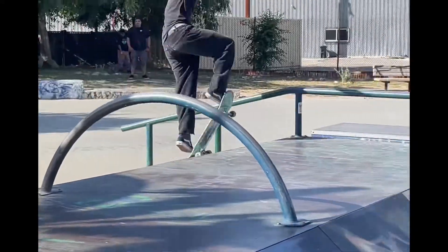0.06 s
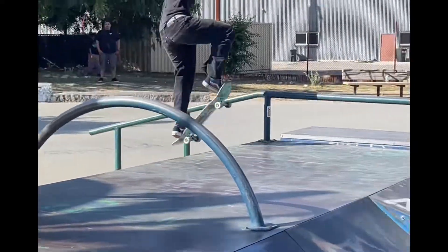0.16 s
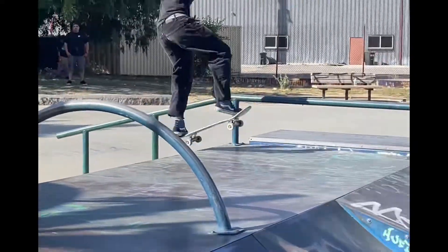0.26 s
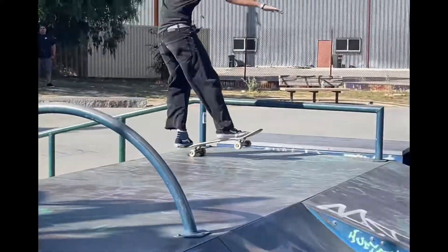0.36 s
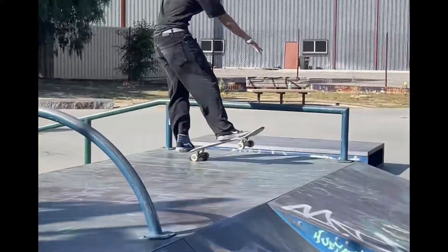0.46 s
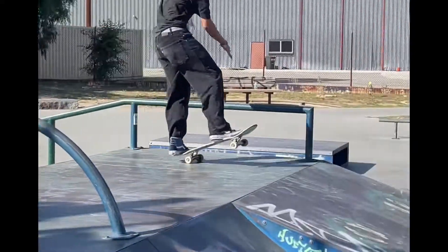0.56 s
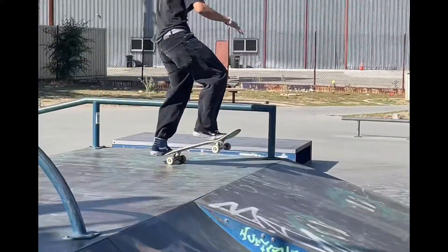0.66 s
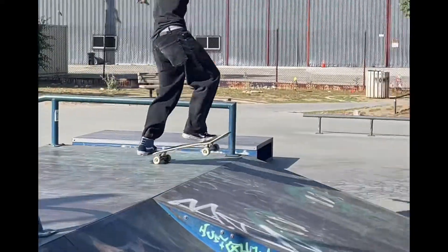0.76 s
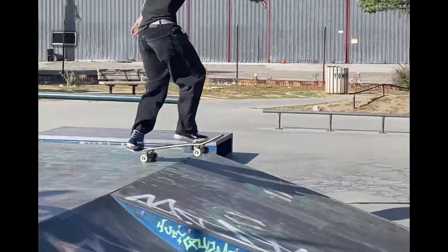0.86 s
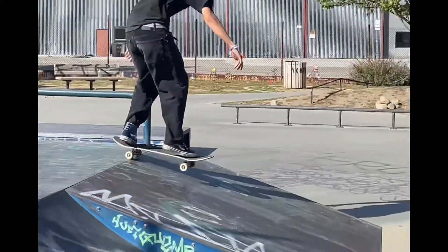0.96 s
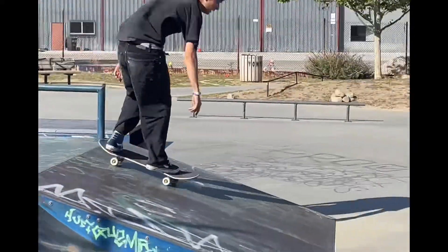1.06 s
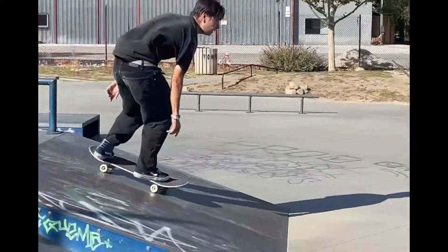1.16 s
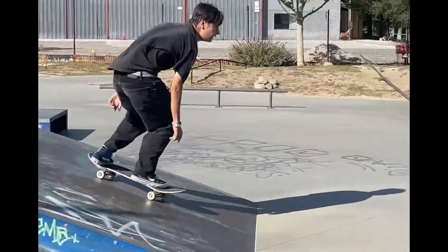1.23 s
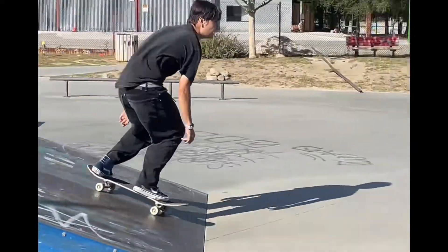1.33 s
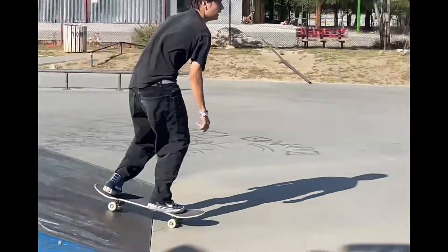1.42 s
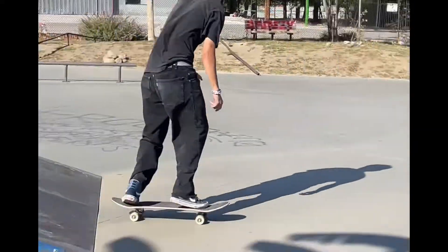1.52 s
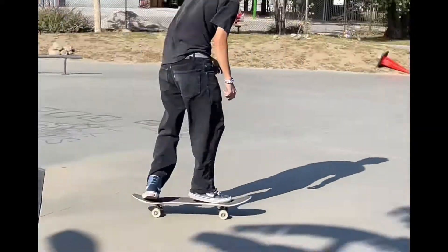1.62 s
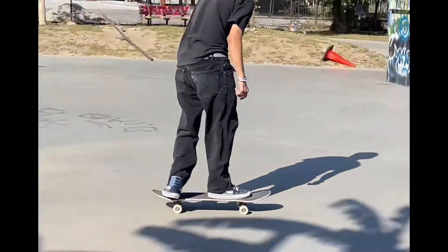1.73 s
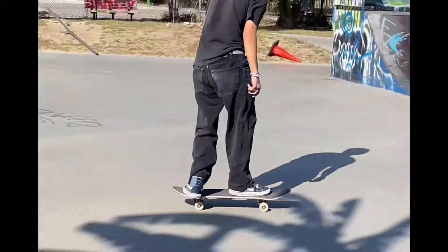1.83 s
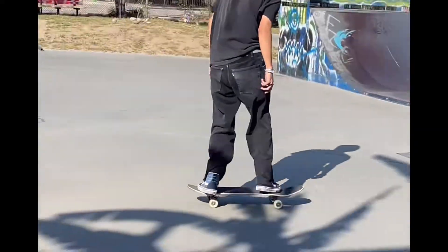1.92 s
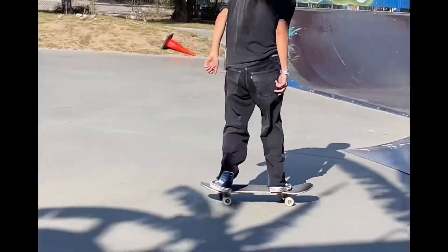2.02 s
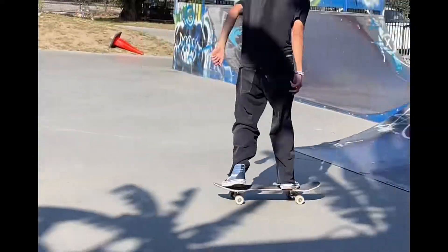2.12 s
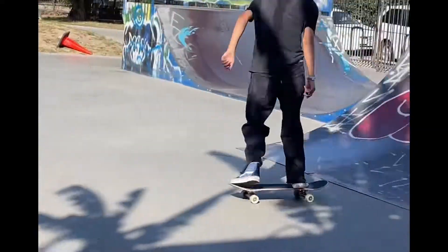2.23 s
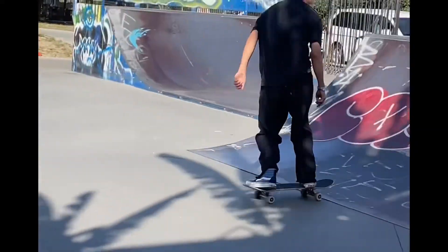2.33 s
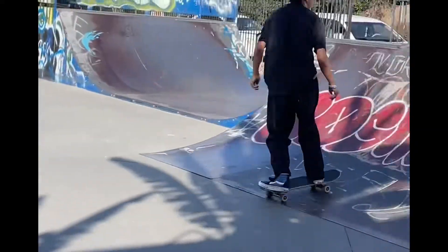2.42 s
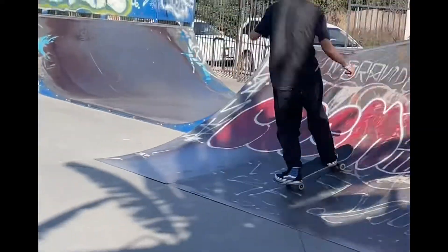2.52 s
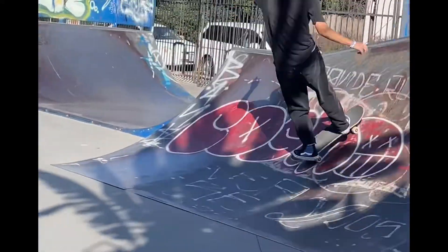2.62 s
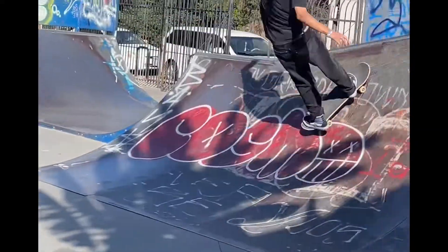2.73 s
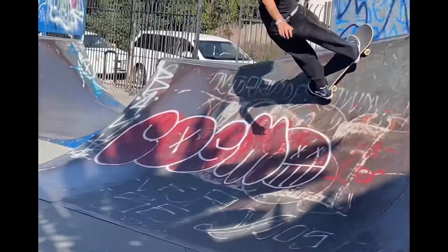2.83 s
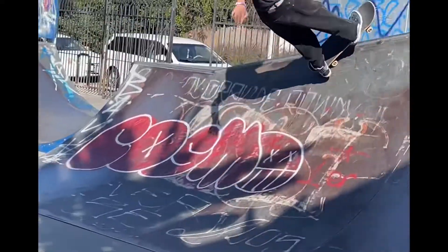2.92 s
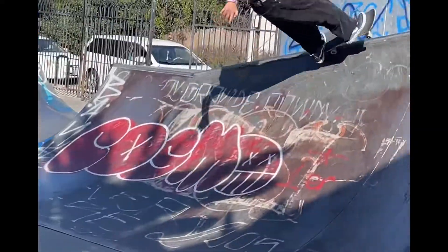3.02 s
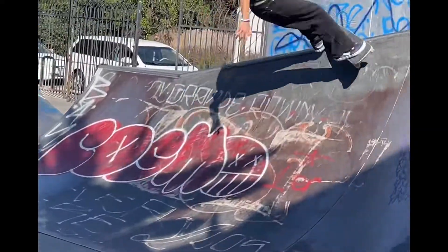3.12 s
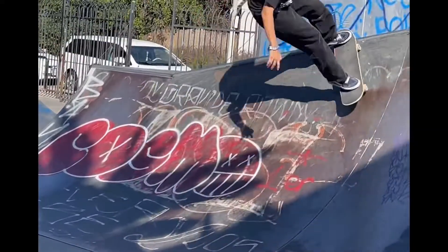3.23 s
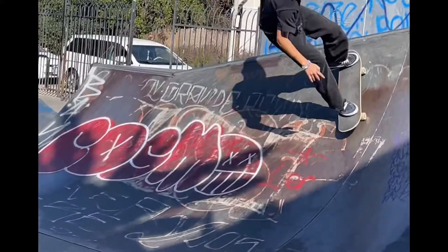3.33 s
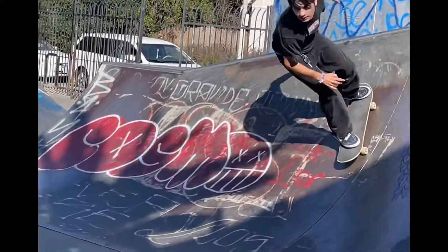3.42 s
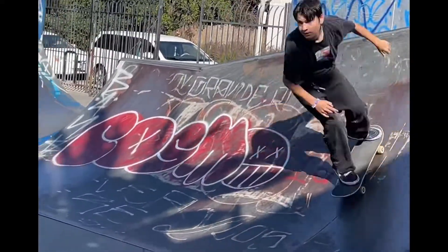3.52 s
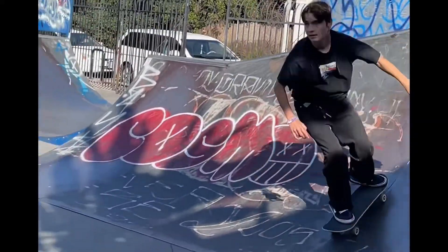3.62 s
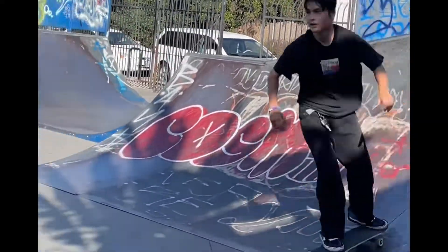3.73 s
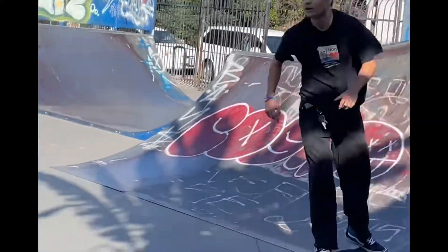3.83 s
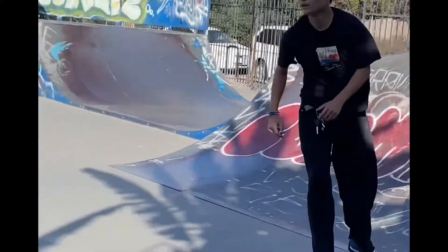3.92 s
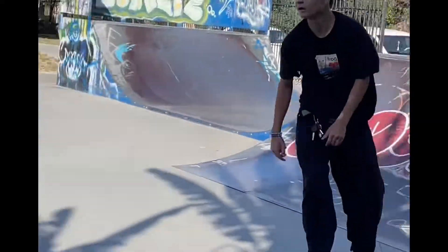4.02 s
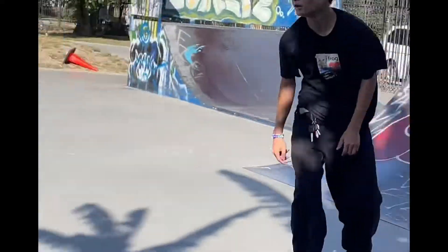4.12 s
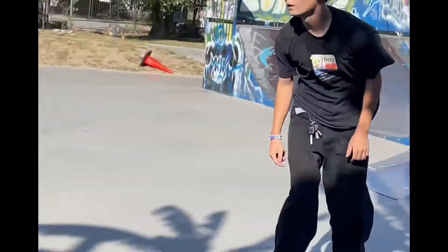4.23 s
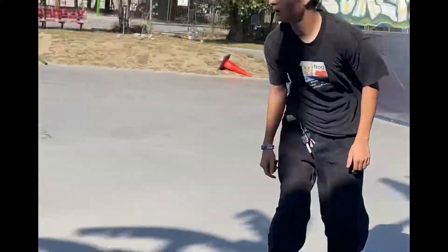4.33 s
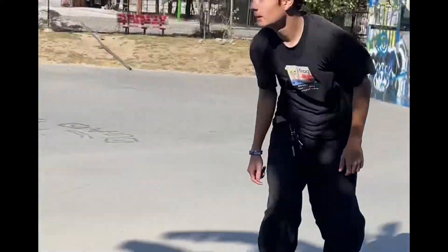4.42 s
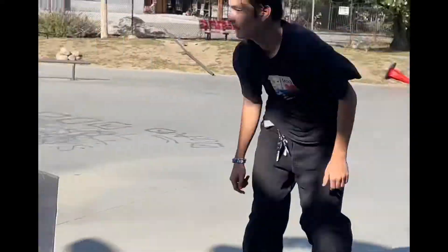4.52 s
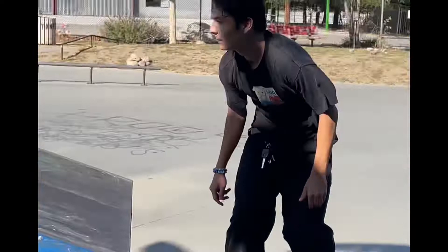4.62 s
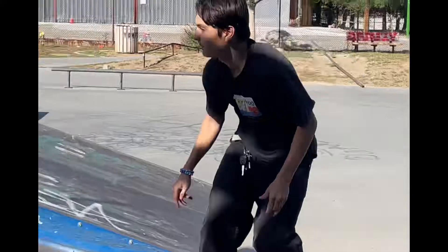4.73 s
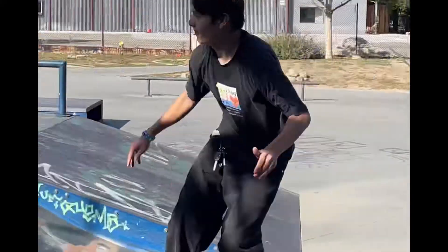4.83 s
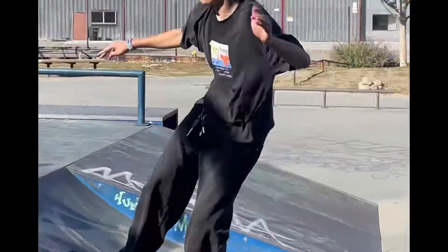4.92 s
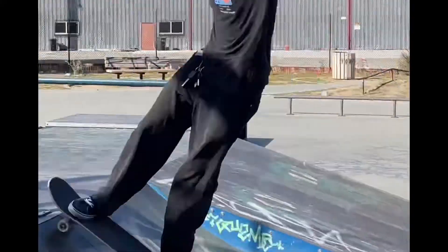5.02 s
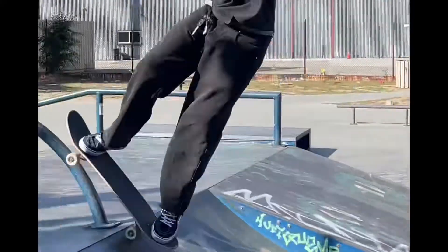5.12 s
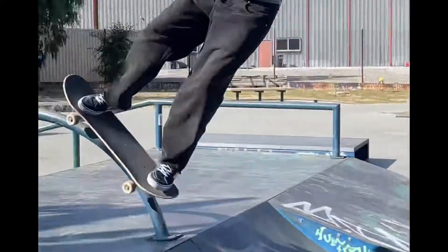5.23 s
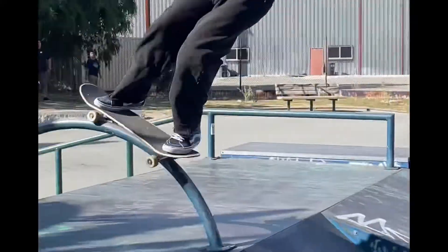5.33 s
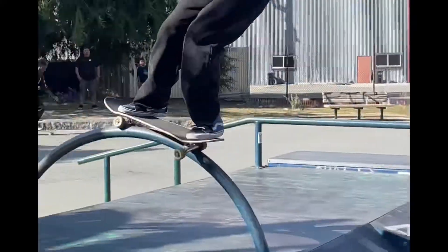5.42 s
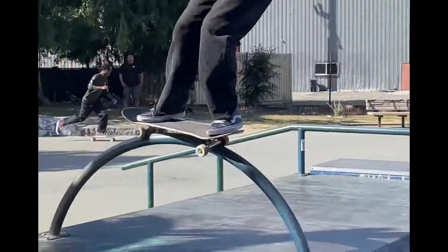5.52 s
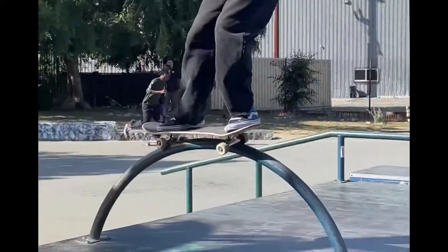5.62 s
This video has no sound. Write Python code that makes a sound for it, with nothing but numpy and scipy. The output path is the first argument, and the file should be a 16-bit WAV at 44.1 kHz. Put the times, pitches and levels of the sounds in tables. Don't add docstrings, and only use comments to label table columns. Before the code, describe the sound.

A skateboard heard from a few metres away in an open-air skatepark, close and mostly dry, with faint short echoes and light low wind. Wheels rumble on a hollow steel-clad box; at 0.33 s the board knocks down sharply with a low thud. The roll softens until about 1.03 s, when loose plates clack and rattle briefly. Dry double slaps at 1.42 and 1.5 s drop onto concrete, where wheels hum, hiss and sing until 2.3 s. A bright steel clatter at 2.37-2.47 s enters the bank; rougher rolling carries small ticks near 2.85-3.0 s, a hard knock at 3.28 s and lighter knocks at 3.8-3.9 s. Smoother concrete rolling fades toward 4.75 s, then loud plate clangs and hollow thuds tumble until 4.95 s. At 5.2 s the deck slams onto a steel rail, ringing briefly with a raspy scrape that eases by 5.4 s; another knock lands at 5.48 s, with faint scraping at the end.

```python
import sys
import numpy as np
from scipy import signal
from scipy.fft import rfft, irfft, next_fast_len
from scipy.io import wavfile
from scipy.ndimage import uniform_filter1d

SR = 44100
rng = np.random.default_rng(int(sys.argv[2]) if len(sys.argv) > 2 else 0)


def wav_record(signal):
    frames = np.transpose(np.atleast_2d(signal))
    bounded = np.clip(frames, -1, 1)
    quanta = np.round(bounded * 32767).astype(np.int16)
    wavfile.write(sys.argv[1], SR, quanta)


def natural_amplitude(level_db):
    exponent = np.asarray(level_db, float) / 20
    return 10 ** exponent


N = 249606

# t/s, load on the ground level/dB, tread roughness level/dB
ROLL = [(0.0, -23.5, -40.5), (0.252, -31, -50.5), (0.43, -21.5, -40.5), (0.721, -32.5, -56.5),
        (1.05, -37, -57.5), (1.2, -24.5, -40.5), (1.59, -20, -43.5), (2.298, -39.5, -63.5),
        (2.41, -29.5, -32), (2.72, -25, -34.5), (2.88, -22.5, -32.5), (3.05, -22.5, -42.5),
        (3.33, -24, -31), (3.6, -31, -37), (4.749, -40, -52), (4.98, -27.5, -47), (5.37, -20.5, -50),
        (5.66, -29, -66)]
# from t/s, lowest bending resonance f/Hz, its share level/dB, deck drone level/dB, bearing hiss level/dB
STRETCHES = [(0, 79.6, 5.5, 3.5, -32), (0.378, 109, -3.5, 7, -29), (0.852, 95.2, 4, 7, -28),
             (1.252, 113.5, -10, 3, -24), (1.42, 200.7, -5.5, 5, -22.5), (1.56, 113.1, 0.5, 2, -21.5),
             (2.1, 111.7, 2.5, 4.5, -17), (2.37, 189.8, -10, 3.5, -24.5), (2.7, 186, -3.5, 4, -22.5),
             (3.069, 114.5, -20, 1, -23.5), (3.17, 114.6, -23.5, 0.5, -27.5),
             (3.251, 90.2, 6.5, 4.5, -15.5), (3.401, 163.2, 4.5, 3, -16), (3.58, 163.1, 0.5, 2.5, -23.5),
             (3.82, 170, -3, 4, -20), (4.151, 166.5, 0.5, -5.5, -24.5), (4.581, 149.3, -1, 2, -18.5),
             (4.759, 164.4, -2.5, 10, -26), (5.302, 109, -15, 10.5, -19.5)]
# f/Hz, level/dB per Hz
RUMBLE = [(35, -44), (60, -11.5), (75, -1), (113, 1), (156, -6), (182, -9.5), (216, -3), (300, -14.5),
          (390, -11), (660, -120)]
# f/Hz, level/dB per Hz
DRONE = [(120, -16.5), (200, -8), (286, -5), (381, -6), (420, -8), (686, -9.5), (1100, -15.5), (1410, -20),
         (2000, -28), (2600, -33), (4400, -120)]
# f/Hz, level/dB per Hz
HISS = [(2500, -33), (3200, -2), (4500, -4), (6500, -3), (8000, -4.5), (10000, -11), (13000, -10.5),
        (15500, -21), (17000, -34)]
# from t/s, to t/s, level/dB
SINGING = [
    (1.543, 2.365, -39),
    (3.936, 4.366, -43.5),
    (4.371, 4.78, -41),
]
# f/Hz, width f/Hz, level/dB
WHEEL_MODES = [(583, 167, 9.5), (900, 610, 2.5), (1420, 390, 6.5), (1800, 360, -3.5), (1990, 93, -1.5),
               (3500, 300, -13.5)]

# t/s, clack level/dB, boom level/dB, knock level/dB, time to fall 60 dB t/s
PLATE_HITS = [(1.0322, -6, -3.5, -2.5, 0.073), (1.0478, -9, -9.5, -16, 0.073),
              (1.0622, -9, -34, -23, 0.046), (1.0825, -31.5, -19.5, -21, 0.42),
              (2.366, 0.5, -10.5, -10.5, 0.21), (2.3914, -15.5, -32, -23, 0.036),
              (2.409, -9, -17, -20, 0.032), (2.4454, -1, -25.5, -13, 0.12),
              (2.4614, -14.5, -15.5, -26.5, 0.29), (3.014, -12.5, -21.5, -20, 0.16),
              (4.7588, 3.5, -4.5, -14.5, 0.1), (4.7724, 1, -18.5, -26, 0.034),
              (4.7875, -18.5, -28, -16.5, 0.38), (4.8338, -6.5, -10.5, -18.5, 0.11),
              (4.8474, -12.5, -26, -15, 0.085), (4.8713, -43, -17, -27, 0.66),
              (5.1968, 6, -37, -8.5, 0.094), (5.2274, -15, -19.5, -25, 0.37),
              (5.255, -1, -17.5, -13, 0.037)]
# t/s, clack level/dB, boom level/dB, knock level/dB, time to fall 60 dB t/s
BOARD_HITS = [(0.0024, -40, -29.5, -50, 0.037), (0.3281, -10, -14.5, -9, 0.076),
              (0.3582, -34, -19.5, -24.5, 0.12), (1.4215, -43, -5.5, -9.5, 0.0076),
              (1.4258, -27, -12, -22, 0.024), (1.4965, -25, -54, -14.5, 0.018),
              (1.508, -19, -16, -16, 0.04), (3.244, -25.5, -38, -24, 0.07), (3.278, -4, -15, -7, 0.026),
              (3.3187, -31, -37, -32, 0.017), (3.806, -16, -26, -27, 0.039),
              (3.8821, -16, -23, -12.5, 0.036), (5.4835, -5, -23, -19, 0.088),
              (5.509, -15, -41.5, -31, 0.032)]
# f/Hz, width f/Hz, level/dB
PLATE_MODES = [(2210, 360, 3.5), (2750, 387, 13.5), (2905, 195, 15), (3220, 245, 8.5), (3540, 1800, 0.5),
               (5100, 200, -16), (5550, 280, -16)]
# f/Hz, width f/Hz, level/dB
BOX_MODES = [(90, 13.4, 1.5), (111.7, 27.5, 4.5), (170, 32.8, 3), (234.3, 16.3, 3.5), (273, 86, -3.5),
             (500, 119, -6)]
# f/Hz, width f/Hz, level/dB
DECK_MODES = [(530, 40, -14), (646, 152, -0.5), (1000, 312, -1), (1400, 300, 1.5), (1700, 670, -6.5)]

# f/Hz, level/dB, time to fall 60 dB t/s
RAIL_MODES = [(497.6, -26.5, 0.23), (537, -27.5, 0.14), (784, -25.5, 0.075), (1147, -36.5, 0.13),
              (2500, -46.5, 0.074), (3240, -45, 0.23), (3300, -50, .1)]
# t/s, level/dB
RAIL_HITS = [
    (5.195, 13.5),
    (5.257, -18),
    (5.331, -4),
    (5.485, -3),
    (5.568, -11.5),
]
# t/s, level/dB
SCRAPE = [
    (5.19, -61),
    (5.202, -5.5),
    (5.3, -5),
    (5.385, -13.5),
    (5.41, -30),
    (5.48, -43),
    (5.55, -56),
    (5.58, -28),
    (5.66, -24),
]

# t/s, peak level/dB, ring f/Hz, width f/Hz
KNOCKS = [(0.3306, -4.5, 2750, 1780), (0.334, -4.5, 1190, 695), (.343, -10.5, 1490, 1210),
          (.353, -14.5, 900, 900), (.39, -26, 2420, 1500), (3.025, -18.5, 3580, 900),
          (3.06, -27.5, 3600, 600), (5.203, -11, 3500, 700), (5.257, -12.5, 3300, 2000),
          (5.259, -15, 1500, 1500), (5.388, -23, 1600, 1500), (1.036, -15.5, 597, 500),
          (1.041, -5.5, 3010, 600), (1.049, -8, 1730, 1090), (1.057, -18, 1950, 500),
          (1.063, -6.5, 2940, 500), (1.082, -15, 2900, 302), (1.096, -11, 2940, 500),
          (1.165, -20.5, 2780, 900), (2.366, -6.5, 843, 604), (2.369, -1.5, 2710, 290),
          (2.367, -5, 3400, 693), (2.371, -8, 177, 120), (2.39, -7.5, 3710, 1510), (2.398, -11.5, 183, 120),
          (2.381, -13.5, 3150, 1200), (2.4, -4.5, 2970, 1000), (2.409, -9.5, 3300, 900),
          (2.444, -9.5, 2710, 900), (2.45, -7, 3270, 1210), (2.456, -11, 2200, 900),
          (2.464, -11.5, 3470, 900), (2.474, -21, 3380, 700), (4.766, -7, 2340, 600),
          (4.772, -2, 3040, 1300), (4.79, -17, 3300, 700), (4.8, -11, 2980, 700),
          (4.833, -15.5, 2980, 1500), (4.845, -11, 3500, 1000), (4.867, -8.5, 2340, 1200),
          (4.878, -11, 3000, 900), (3.18, -17.5, 816, 300), (3.205, -16.5, 1240, 300),
          (3.2435, -19, 1700, 900), (3.253, -36, 1650, 300), (3.265, -16, 1580, 298),
          (3.279, -2, 1560, 900), (3.281, -7, 700, 600), (3.319, -16, 1240, 500),
          (3.8075, -28.5, 2200, 900), (3.815, -20.5, 1320, 790)]
# t/s, peak level/dB, ring f/Hz, width f/Hz
SLAPS = [(.084, -16, 2600, 2500), (.255, -27.5, 2180, 2500), (1.0335, -9.5, 424, 400),
         (1.4205, -5.5, 900, 1400), (1.428, -9, 785, 1190), (1.434, -6.5, 500, 500),
         (1.496, -7.5, 1120, 1400), (1.4975, -7, 139, 119), (1.507, -6, 697, 600),
         (2.9574, -13, 1400, 1200), (3.014, -12.5, 2500, 2500), (3.243, -32, 2180, 2500),
         (3.808, -19, 1790, 2000), (3.8835, -14.5, 1080, 1400), (5.4835, -11.5, 1600, 1990)]
# t/s, peak level/dB, ring f/Hz, width f/Hz
THUDS = [(.357, -15.5, 397, 250), (.381, -19, 222, 120), (.415, -10.5, 208, 100), (2.37, -18.5, 103, 50),
         (2.9, -20.5, 135, 60), (2.932, -11.5, 130, 59.5), (2.962, -21.5, 117, 60), (3.815, -19, 197, 101),
         (4.759, -14.5, 418, 248), (5.199, -5.5, 500, 201), (1.047, -16.5, 170, 90), (1.057, -11, 114, 60),
         (1.088, -14, 132.4, 59.6), (1.155, -10.5, 105.5, 50), (1.195, -19.5, 152, 81.5),
         (1.5, -25.5, 196, 90), (2.478, -8, 308, 198), (3.282, -10.5, 104.3, 60), (3.345, -15, 216, 150),
         (3.374, -16.5, 204, 151), (4.78, -10.5, 405, 200), (4.806, -6, 374, 200), (4.862, -9.5, 308, 151),
         (4.887, -18.5, 376, 150), (4.91, -11, 322, 151), (4.945, -9, 303, 131), (5.225, -9.5, 540, 99)]
# t/s, peak level/dB, ring f/Hz, width f/Hz
CLANGS = [(1.04, -7, 2000, 1500), (1.063, -16.5, 2900, 1500), (1.11, -31, 2880, 900),
          (.345, -21, 1860, 2000), (1.436, -22, 2860, 1400), (1.545, -25.5, 2000, 1990),
          (3.29, -24.5, 4050, 3000), (3.345, -22.5, 3500, 2500), (1.515, -21, 2780, 900),
          (2.455, -11, 3740, 2000), (3.015, -22.5, 3510, 1000), (4.761, -2.5, 3280, 596),
          (4.763, -4.5, 373, 130), (4.837, -9, 2450, 900), (4.845, -31.5, 3500, 2190)]
# t/s, peak level/dB, ring f/Hz, width f/Hz
SNAPS = [(1.4205, -36, 9400, 6000), (1.428, -35, 10000, 5030), (1.497, -14, 11000, 5040),
         (1.507, -21.5, 9600, 6030), (.33, -30.5, 10500, 5000), (1.032, -35, 10500, 5000),
         (2.364, -36.5, 10500, 5000), (4.759, -16, 10500, 5012), (2.9574, -21.5, 10500, 5030),
         (3.277, -20.5, 10500, 4970), (3.8835, -23.5, 10500, 5000), (5.1955, -1.5, 10400, 5028)]
# t/s, peak level/dB, ring f/Hz, width f/Hz
TICKS = [(0.0847, -20, 2870, 2720), (.167, -30.5, 4040, 4030), (0.2545, -24, 2020, 3020),
         (.561, -42.5, 5300, 1500), (.942, -45, 3500, 2500), (.994, -39.5, 5000, 2500),
         (2.8448, -20, 2100, 1200), (2.849, -15, 1100, 700), (2.847, -30, 5800, 1500),
         (2.885, -21, 1900, 800), (2.8845, -18.5, 5220, 1090), (2.9574, -17.5, 1550, 345),
         (3.165, -26, 2500, 3500), (3.18, -23.5, 5000, 4000), (3.243, -35, 3500, 3500),
         (3.277, -3, 3435, 900), (3.835, -22.5, 4940, 3500), (3.85, -23, 5000, 3500),
         (3.8835, -38, 1760, 900), (5.143, -25.5, 5730, 1800), (5.195, -6, 1400, 300),
         (5.378, -29, 5750, 1490), (5.4846, -15.5, 2010, 796), (5.525, -20.5, 1470, 1200)]

# t/s, peak level/dB
GUSTS = [
    (0.0, -42.5),
    (.5, -32),
    (1.22, -28.5),
    (1.88, -33),
    (5.4, -43.5),
]
# f/Hz, level/dB
PORT_SUM = [(28, -15.5), (44, -0.5), (5000, -0.5), (6300, -5.5), (7500, -12), (9100, -12), (9500, -24),
            (13900, -33.5), (14600, -15.5), (15700, -11.5), (16200, -21)]
# f/Hz, level/dB
PORT_DIFFERENCE = [(100, -47), (200, -39), (380, -21), (700, -14.5), (1300, -21), (2800, -10),
                   (3450, -10.5), (3600, -45.5), (5000, -38.5), (5200, -9), (7000, -7.5), (12000, -5),
                   (13500, -18), (15600, -3.5), (16000, -52)]


def rms_one(x):
    return x / np.sqrt(np.mean(x ** 2) + 1e-20)


def at_hz(points, hz):
    table = np.array(points)
    return np.interp(np.log(np.maximum(hz, 1)), np.log(table[:, 0]), table[:, 1])


def coloured(x, spectrum):
    hz = np.arange(N // 2 + 1) * SR / N
    return rms_one(irfft(rfft(x) * natural_amplitude(at_hz(spectrum, hz)), N))


def band(x, low_hz, high_hz):
    edges = [low_hz, min(high_hz, 0.45 * SR)]
    return signal.sosfilt(signal.butter(2, edges, "band", fs=SR, output="sos"), x)


def drift(rate):
    step = 40
    r = np.exp(-2 * np.pi * step * rate / SR)
    noise = rng.standard_normal(N // step + 2002)
    slow = signal.lfilter([1], [1, -2 * r, r * r], noise)[2000:]
    return np.interp(np.arange(N) / step, np.arange(len(slow)), rms_one(slow))


def body(x, peaks, widen):
    out = 0
    for k, (hz, width, db) in enumerate(peaks):
        r = np.exp(-np.pi * width * widen / SR)
        b = (1 - r * r) / 2 * np.array([1, 0, -1])
        a = [1, -2 * r * np.cos(2 * np.pi * hz / SR), r * r]
        out = out + (-1) ** k * natural_amplitude(db) * signal.lfilter(b, a, x)
    return out


def grit(per_s, spread_db):
    strength = natural_amplitude(spread_db * np.minimum(rng.exponential(1, N), 4))
    sizes = strength * rng.choice([-1, 1], N)
    return rms_one(sizes * (rng.random(N) < per_s / SR))


def along(column):
    ground = np.array(STRETCHES)
    at = np.searchsorted(ground[:, 0], np.arange(N) / SR, side="right") - 1
    change_s = 0.097
    return uniform_filter1d(ground[np.maximum(at, 0), column], int(change_s * SR))


def rolling():
    s, *levels = np.transpose(ROLL)
    load_db, tread_db = [np.interp(np.arange(N) / SR, s, c) for c in levels]
    deck_db = 0.42 * load_db + 0.58 * tread_db + along(column=3)
    hiss_db = 0.41 * tread_db + along(column=4)
    bumps = 0.47 * drift(17)

    rumble = 0.71 * coloured(rng.standard_normal(N), RUMBLE) + 0.61 * bend()
    deck = coloured(grit(3000, spread_db=2.0), DRONE)
    tread = rms_one(band(grit(6000, spread_db=-5.0), 840, 3600))
    hiss = coloured(grit(9000, spread_db=2.5), HISS)

    out = natural_amplitude(load_db + 1.5 + 0.24 * drift(5.9)) * rumble
    out = out + natural_amplitude(deck_db + 2.5 + 0.58 * bumps) * deck
    out = out + natural_amplitude(tread_db - 0.5 + 2.7 * bumps) * tread
    return out + natural_amplitude(hiss_db - 5.0 + 2.7 * bumps) * hiss


def bend():
    turn = 2 * np.pi * np.cumsum(along(column=1)) / SR
    hum = drift(18.0) * np.cos(turn) + drift(14.3) * np.sin(turn)
    return natural_amplitude(along(column=2)) * rms_one(hum)


def wheels():
    grain, t = grit(5000, spread_db=-4.5), np.arange(N) / SR
    song = 0
    for k, peak in enumerate(WHEEL_MODES):
        flicker = natural_amplitude(1.0 * drift(8.0))
        song = song + (-1) ** k * flicker * body(grain, [peak], widen=1.0)
    level = sum(natural_amplitude(db + 2.0) * (t > start) * (t < end) for start, end, db in SINGING)
    return rms_one(song) * level


def blows(table, rise_s, boom_stretch, knock_stretch, sizzle_stretch, sizzle_db, sizzle_follows):
    out, t = np.zeros((4, N)), np.arange(SR // 2) / SR
    stretch = np.array([[1], [boom_stretch], [knock_stretch], [sizzle_stretch]])
    for s, clack_db, boom_db, knock_db, t60 in table:
        blow_sizzle_db = sizzle_db + sizzle_follows * max(clack_db, knock_db)
        level = natural_amplitude([clack_db, boom_db, knock_db, blow_sizzle_db])[:, None]
        rise = 1 - np.exp(-t / (rise_s * stretch))
        fall = natural_amplitude(-60 * t / (max(t60, 0.01) * stretch))
        i = max(round((s - rise_s) * SR), 0)
        out[:, i:i + len(t)] += (level * rise * fall)[:, :N - i]
    return out


def struck(envelopes, clack_filter, trim_db):
    def box(x):
        return body(x, BOX_MODES, widen=3.73) + 0.058 * band(x, 70, 260)

    def deck(x):
        return body(x, DECK_MODES, widen=2.35) + 0.2 * band(x, 450, 1720)

    def hardware(x):
        return band(x, 4000, 16000) + 0.15 * band(x, 8000, 16500)

    out = 0
    for envelope, through, db in zip(envelopes, [clack_filter, box, deck, hardware], trim_db):
        rattle = grit(4000, spread_db=1.0)
        heard = through(rattle * envelope + 1e-18)
        out = out + natural_amplitude(db) * heard / np.std(through(rattle))
    return out


def plates():
    def sheet(x):
        return body(x, PLATE_MODES, widen=2.05) + 0.49 * band(x, 1900, 5120)

    envelopes = blows(PLATE_HITS, rise_s=0.0037, boom_stretch=1.97, knock_stretch=1.0,
                      sizzle_stretch=0.87, sizzle_db=-32, sizzle_follows=0.93)
    return struck(envelopes, sheet, trim_db=[-10, -2.0, -1.0, -11.0])


def board():
    def clack(x):
        return band(x, 1800, 6100)

    envelopes = blows(BOARD_HITS, rise_s=0.0022, boom_stretch=3.2, knock_stretch=1.71,
                      sizzle_stretch=0.62, sizzle_db=-20.5, sizzle_follows=0.81)
    return struck(envelopes, clack, trim_db=[-15, 3.5, 1.4, 6.5])


def rail():
    hit_s, hit_db = np.transpose(RAIL_HITS)
    at = [round(s * SR) for s in hit_s]
    s, level_db = np.transpose(SCRAPE)
    scrape_db = np.interp(np.arange(N) / SR, s, level_db, left=-200) - 10.5
    scrape = natural_amplitude(scrape_db) * grit(1100, spread_db=3.0)
    out = natural_amplitude(-9.5) * band(scrape, 1200, 5500)
    for hz, mode_db, t60 in RAIL_MODES:
        grip = hz / np.hypot(hz, 1540)
        force = natural_amplitude(mode_db) * scrape * grip + 1e-18
        force[at] += natural_amplitude(hit_db + mode_db + rng.normal(0, 2, len(at)))
        r, w = natural_amplitude(-60 / (t60 * SR)), 2 * np.pi * hz / SR
        out = out + signal.lfilter([0, np.sin(w)], [1, -2 * r * np.cos(w), r * r], force)
    return out


def contacts(table, t60, sizzle_db):
    out = np.zeros(N)
    t = np.arange(int((0.05 + 1.1 * t60) * SR)) / SR
    chatter_level = (1 - np.exp(-t / 0.00023)) * natural_amplitude(-60 * t / max(t60, 0.008))
    for s, db, hz, width in table:
        push = np.sqrt(SR / width) * 0.35 * np.exp(-0.5 * ((t - 0.0006) * 5 * hz) ** 2)
        force = push + rng.standard_normal(len(t)) * chatter_level
        mode = [(hz, width, 0)]
        ringing = body(body(force, mode, widen=0.76), mode, widen=0.76)
        parts = [ringing, band(force, hz / 4.0, hz * 2.78), band(force, 3700, 18000)]
        ringing, snap, sizzle = [part / np.max(np.abs(part)) for part in parts]
        hit = natural_amplitude(db - 0.5) * (ringing + 0.61 * snap) + natural_amplitude(db + sizzle_db + 7) * sizzle
        i = round((s - 0.001) * SR)
        out[i:i + len(t)] += hit[:N - i]
    return out


def short_knocks():
    return contacts(KNOCKS, t60=0.051, sizzle_db=-29)


def seam_slaps():
    return contacts(SLAPS, t60=0.012, sizzle_db=-14)


def ramp_thuds():
    return contacts(THUDS, t60=0.055, sizzle_db=-49)


def steel_clangs():
    return contacts(CLANGS, t60=0.21, sizzle_db=-28)


def bright_snaps():
    return contacts(SNAPS, t60=0.019, sizzle_db=-26)


def hardware_ticks():
    return contacts(TICKS, t60=0.036, sizzle_db=-10)


def echoes(x, t60, first_s):
    t = np.arange(SR // 2) / SR
    scatter = band(rng.standard_normal(len(t)), 120, 5800)
    scatter = scatter * natural_amplitude(-60 * t / t60) * (t > first_s)
    return signal.fftconvolve(x, scatter / np.sqrt(np.sum(scatter ** 2)))[:N]


def air():
    t = np.arange(N) / SR
    calm = natural_amplitude(-47)
    level = calm + sum(natural_amplitude(db - 49.5 * np.abs(t - s)) for s, db in GUSTS)
    low = rms_one(band(band(rng.standard_normal(N), 42, 70), 36, 75))
    return natural_amplitude(1.5) * level * low


def scene():
    hits = plates() + board() + rail()
    hits = hits + short_knocks() + seam_slaps() + ramp_thuds()
    hits = hits + steel_clangs() + bright_snaps() + hardware_ticks()
    sound = rolling() + wheels() + hits
    sound = sound + natural_amplitude(-16.5) * echoes(hits, t60=0.47, first_s=0.022) + air()
    return np.array([sound, sound])


def roll_off(x):
    return signal.sosfilt(signal.butter(12, 16840, fs=SR, output="sos"), x)


def record(dry):
    size = next_fast_len(N + 4096)
    hz = np.arange(size // 2 + 1) * SR / size
    rounded = 1.176 * np.tanh(dry[0] / 1.455)
    direct = rfft(rounded, size)
    fluttering = rfft(rounded * drift(40), size)
    mid = irfft(direct * natural_amplitude(at_hz(PORT_SUM, hz)), size)[:N]
    difference = 0.95j * direct + 0.55 * fluttering
    side = irfft(difference * natural_amplitude(at_hz(PORT_DIFFERENCE, hz)), size)[:N]
    ports = np.clip([mid + side, mid - side], -1, 1)
    return roll_off(ports)


dry = scene()
out = record(dry)
wav_record(out)
```